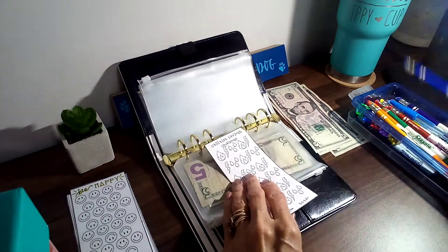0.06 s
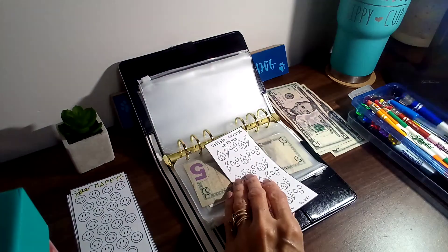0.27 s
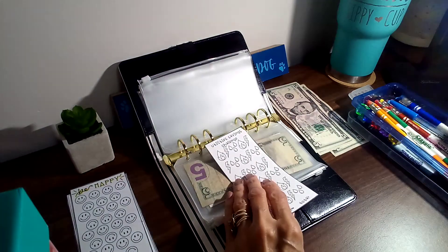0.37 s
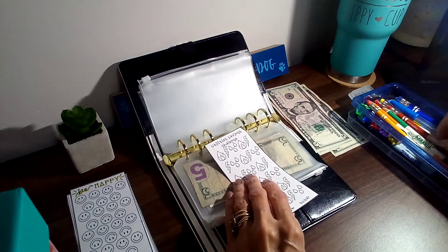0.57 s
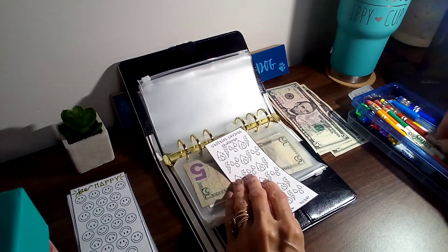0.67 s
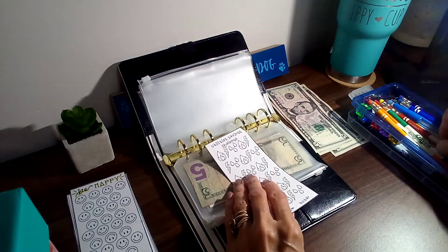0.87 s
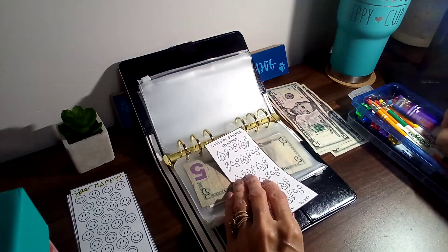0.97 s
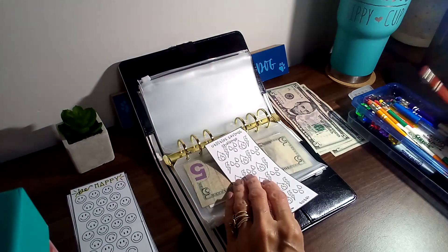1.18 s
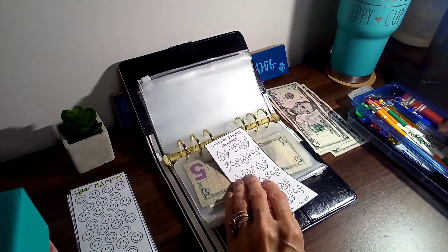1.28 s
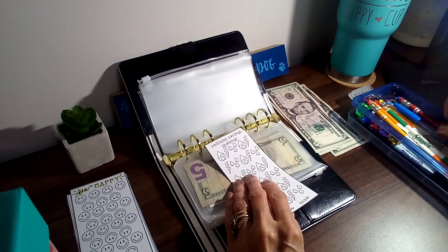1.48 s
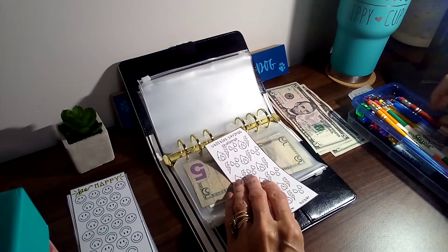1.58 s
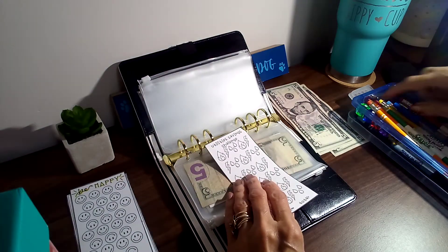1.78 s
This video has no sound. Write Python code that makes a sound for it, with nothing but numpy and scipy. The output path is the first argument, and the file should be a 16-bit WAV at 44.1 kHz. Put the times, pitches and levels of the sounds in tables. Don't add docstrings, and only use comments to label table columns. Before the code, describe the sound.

Markers and crayons clack sharply as a hand digs through a plastic box, with small shuffles and soft box thuds; a few drop, a short pause, then a last rummage. Small room, close small microphone.

```python
import sys
import numpy as np
from scipy import signal
from scipy.fft import rfft, irfft
from scipy.io import wavfile

SR = 44100
rng = np.random.default_rng(int(sys.argv[2]) if len(sys.argv) > 2 else 0)


def linear_from_db(decibels):
    return 10 ** (np.asarray(decibels, float) / 20)


def generate_wav(sig):
    pcm = np.round(np.clip(np.atleast_2d(sig).T, -1, 1) * 32767).astype(np.int16)
    wavfile.write(sys.argv[1], SR, pcm)


N = 81585


def rms_one(x):
    return x / np.sqrt(np.mean(x ** 2) + 1e-20)


def at_hz(points, hz):
    table = np.array(points)
    return np.interp(np.log(hz), np.log(table[:, 0]), table[:, 1])


def ring(force, hz, t60_s):
    r, w = linear_from_db(-60 / (t60_s * SR)), 2 * np.pi * hz / SR
    return signal.lfilter([0, np.sin(w)], [1, -2 * r * np.cos(w), r * r], force + 1e-18)


def cut(x, hz, kind, order=2):
    return signal.sosfilt(signal.butter(order, hz, kind, fs=SR, output="sos"), x)


# (frequency [Hz], level [dB])
FLOOR = [(40, -6), (65, 0), (300, -5), (1000, -13), (3000, -20), (6500, -28), (9000, -37), (13800, -36)]
FLOOR_DB = -75.5


def floor():
    hz = np.maximum(np.fft.rfftfreq(N, 1 / SR), 20)
    spectrum = rfft(rng.standard_normal(N)) * linear_from_db(at_hz(FLOOR, hz))
    return linear_from_db(FLOOR_DB) * rms_one(irfft(spectrum, N))


# (frequency [Hz], t60 [s])
ROOM_DECAY = [(300, 0.61), (1000, 0.31), (3000, .22), (6000, 0.14), (14000, 0.16)]
ROOM_DB, ROOM_GRAIN_DB, ROOM_LOW_HZ = -6, 5.5, 700
ROOM_DELAY_S, ROOM_END_S = 0.0044, 0.24


def room(x):
    t = np.arange(SR // 2) / SR
    edges_hz = 70 * 2. ** np.arange(9)
    echo = np.zeros(len(t))
    for low_hz, high_hz in zip(edges_hz, edges_hz[1:]):
        band = cut(rng.standard_normal(len(t)), [low_hz, high_hz], "band")
        echo += band * linear_from_db(-60 * t / at_hz(ROOM_DECAY, np.sqrt(low_hz * high_hz)))
    echo *= (1 - np.exp(-(t / ROOM_DELAY_S) ** 2)) * np.exp(-(t / ROOM_END_S) ** 4)
    echo *= linear_from_db(ROOM_GRAIN_DB * rms_one(cut(rng.standard_normal(len(t)), 200, "low")))
    echo /= np.sqrt(np.sum(echo ** 2))
    return linear_from_db(ROOM_DB) * signal.fftconvolve(cut(x, ROOM_LOW_HZ, "high", order=1), echo)[:N]


# (frequency [Hz], level [dB], t60 [s])
TAP_MODES = [
    (324, -60, 0.075),
    (1700, -73, 0.024),
    (3430, -66, 0.027),
]
TAP_S = 0.092


def tap():
    click = np.zeros(N)
    click[int(TAP_S * SR)] = 1
    return sum(linear_from_db(db) * ring(click, hz, t60_s) for hz, db, t60_s in TAP_MODES)


# (time [s], peak level [dB])
ROCK = [(0.239, -50.5), (0.318, -53), (0.383, -51), (0.508, -48), (0.559, -47.5), (0.584, -42),
        (0.724, -45), (0.819, -57.5), (0.945, -59), (1.069, -43.5), (1.119, -55.5), (1.219, -64),
        (1.338, -56), (1.445, -55), (1.509, -50), (1.569, -50)]
# (frequency [Hz], level [dB], t60 [s])
DESK = [(66, -6, .13), (88, -7, .12), (118, -9, .09), (172, -9, .1)]
# (frequency [Hz], level [dB], t60 [s])
BOX = [(168, -9, .1), (230, -16, .07), (350, -4, .12), (400, -14, .06), (495, -2, .08), (950, -12, .06)]
ROCK_SOFT_HZ, BOX_LOW_HZ = 201.1, 140


def box(push):
    s, rock_db = np.transpose(ROCK)
    rock = np.zeros(N)
    rock[(s * SR).astype(int)] = linear_from_db(rock_db)
    desk, thud = np.zeros((2, N))
    for hz, db, t60_s in DESK:
        uneven = rng.uniform(0.9, 2.42, N) * rng.choice([-1, 1], N)
        desk += linear_from_db(db) * ring(rock * uneven, hz, t60_s)
    for hz, db, t60_s in BOX:
        thud += linear_from_db(db) * ring(push * rng.uniform(0.87, 2.29, N), hz, t60_s)
    return cut(desk, ROCK_SOFT_HZ, "low", order=4) + cut(thud, BOX_LOW_HZ, "high")


# (time [s], level [dB])
STIR = [(.2, -45), (.25, -63), (.31, -60.5), (.46, -61), (.57, -48.5), (.66, -70.5), (0.738, -45.5),
        (.87, -105), (0.951, -59.5), (1.04, -87), (1.07, -66), (1.158, -53), (1.241, -73.5), (1.43, -45),
        (1.499, -57.5), (1.58, -56), (1.679, -81)]
# (start [s], end [s])
HAND = [
    (.2, 1.24),
    (1.43, 1.68),
]
SHUFFLES_PER_S, SHUFFLE_SPREAD_DB, SHUFFLE_CYCLES = 900, 2.37, 7


def shuffle():
    s, db = np.transpose(STIR)
    sizes = linear_from_db(SHUFFLE_SPREAD_DB * np.minimum(rng.exponential(1, N), 4)) * rng.choice([-1, 1], N)
    happens = rng.random(N) < SHUFFLES_PER_S / SR
    touches = linear_from_db(np.interp(np.arange(N) / SR, s, db)) * rms_one(sizes * happens)
    n = np.arange(N)
    touches = touches * sum((n > start * SR) & (n < end * SR) for start, end in HAND)
    dealt = rng.integers(0, 16, N)
    rings = np.zeros(N)
    for k, hz in enumerate(np.geomspace(900, 6800, num=16)):
        rings += ring(touches * (dealt == k), hz, SHUFFLE_CYCLES / hz)
    return rings / 4, touches


# (time [s], peak level [dB], barrel pitch [Hz], relative thud [dB], relative sharpness [dB])
DIG = [(0.203, -41, 1610, -23, -47), (0.205, -24, 1840, -6, -23), (0.233, -26.5, 1460, -14, 2),
       (0.238, -23, 2020, -15, -76), (0.257, -32.5, 1420, -10, -32), (0.291, -14.5, 2470, -26.5, -4.5),
       (0.373, -18.5, 4270, -23.5, -10), (0.441, -40.5, 1740, -7.5, -32), (0.486, -23.5, 2030, -25, -10.5),
       (0.517, -32, 3340, -39, -9), (0.529, -36, 4600, -45, -17), (0.538, -36.5, 2800, -44, -0.5),
       (0.551, -28.5, 2600, -40, -14), (0.561, -23, 3080, -10, -13), (0.579, -23, 2100, -41, -21),
       (0.593, -26, 2520, -15.5, -22), (0.642, -42, 2260, -51, -36), (0.676, -38.5, 1740, -21, -2.5),
       (0.685, -38, 1870, -30, -4), (0.721, -34, 1870, -28, -14.5), (0.727, -21.5, 3170, -35, -8.5),
       (0.75, -39.5, 3200, -35, -31), (0.769, -30, 3280, -52, -29)]
# (time [s], peak level [dB],
# barrel pitch [Hz], relative thud [dB], relative sharpness [dB])
LATER = [(0.876, -54.5, 1460, -32, -41), (0.9, -39.5, 2570, -60, -31), (0.928, -30, 4630, -58, -10.5),
         (0.941, -42.5, 1950, -42, -26), (0.947, -32, 2100, -25, -16.5), (1.012, -43, 3100, -31, -5),
         (1.025, -56, 6690, -13.5, 2), (1.05, -27.5, 4770, -45.5, -25.5), (1.054, -20.5, 6170, -17, -12.5),
         (1.058, -14, 3700, -41.5, -11.5), (1.11, -32, 2190, -17, -27), (1.14, -22.5, 4560, -36, -37),
         (1.145, -21.5, 3110, -30.5, -13), (1.161, -31, 3130, -21, -5.5), (1.433, -32, 1890, -49, -7),
         (1.444, -18.5, 2300, -28, -10.5), (1.489, -21.5, 5130, -26, -12.5), (1.504, -21, 4830, -49, -1.5),
         (1.531, -24.5, 2000, -43, -17.5), (1.57, -23, 3400, -22.5, -10.5)]
# (frequency [Hz], level [dB])
BARREL = [(950, -14.5), (1280, -37), (1640, -16), (1900, -5.5), (2250, -10.5), (2620, 1.5), (3100, -3),
          (3500, 4.5), (4050, -20.5), (4450, 11.5), (5200, -17.5), (5900, 7), (6500, 3.5)]
OWN_CYCLES, WALL_CYCLES = 32, 10
MODE_SPREAD_DB, DETUNE = 2.0, 0.05
OWN_DB, CRACK_DB, CLACK_DB, BOX_DB = -4, -17, 1, -10.5
CONTACT_S, RAGGED, SETTLE_DB, SETTLE_S = 0.001, 0.13, -29, 0.0069
PURER_DB_PER_DB, NEAR_DB_PER_OCTAVE = 0.15, 5.0
BODY_LOW_HZ = 1104


def contact(t, noise):
    edge = RAGGED * noise * (t / CONTACT_S) * np.exp(-t / CONTACT_S)
    force = edge + linear_from_db(SETTLE_DB) * noise ** 3 * np.exp(-t / SETTLE_S)
    force[int(CONTACT_S * SR)] += 1
    return force / np.sqrt(np.sum(force ** 2))


def clacks():
    rows, size = np.array(DIG + LATER), 4096
    t = np.arange(size) / SR
    click = 1. * (np.arange(size) == int(CONTACT_S * SR))
    body, sharp, push = np.zeros((3, N + size))
    for s, db, hz, thud_db, sharp_db in rows:
        force = contact(t, rng.standard_normal(size))
        own_db = OWN_DB - PURER_DB_PER_DB * (db + 21)
        hit = linear_from_db(own_db) * ring(click, hz, OWN_CYCLES / hz) + linear_from_db(CRACK_DB) * 4 * force
        for mode_hz, mode_db in BARREL:
            far_db = NEAR_DB_PER_OCTAVE * abs(np.log2(mode_hz / hz))
            gain = linear_from_db(mode_db + MODE_SPREAD_DB * rng.standard_normal() - far_db)
            tuned_hz = mode_hz * (1 + DETUNE * rng.standard_normal())
            hit = hit + gain * ring(force, tuned_hz, WALL_CYCLES / mode_hz)
        hit = cut(hit, BODY_LOW_HZ, "high")
        i = int((s - CONTACT_S / 2) * SR)
        body[i:i + size] += linear_from_db(db + CLACK_DB) * hit / np.max(np.abs(hit))
        sharp[i:i + size] += linear_from_db(db + sharp_db) * force
        push[i] += linear_from_db(db + thud_db + BOX_DB)
    return body[:N], sharp[:N], push[:N]


ROLL_HZ, SHELF_DB = 7000, 3
PORT_HZ, PORT_WIDTH_HZ, PORT_DB = 15200, 403, 23


def capsule(body, sharp):
    r, w = np.exp(-np.pi * PORT_WIDTH_HZ / SR), 2 * np.pi * PORT_HZ / SR
    zeros = np.array([1, 0, -1]) * (1 - r * r) / 2
    port = signal.lfilter(zeros, [1, -2 * r * np.cos(w), r * r], sharp)
    shelf = linear_from_db(SHELF_DB) * cut(sharp, ROLL_HZ, "high")
    return cut(body, ROLL_HZ, "low", order=8) + shelf + linear_from_db(PORT_DB) * port


SHUFFLE_SHARP_DB, SHUFFLE_LOW_DB, SELF_NOISE_DB = -29, -13, -101


def scene():
    body, sharp, push = clacks()
    rings, touches = shuffle()
    push = push + linear_from_db(SHUFFLE_LOW_DB) * touches / 10
    body = body + rings + box(push) + tap()
    self_noise = linear_from_db(SELF_NOISE_DB) * rng.standard_normal(N)
    near = capsule(body, sharp + linear_from_db(SHUFFLE_SHARP_DB) * touches + self_noise)
    return (near + room(near) + floor())[None]


def band_limit(x):
    return signal.sosfilt(signal.butter(12, 16950, fs=SR, output="sos"), x)


LOW_CUT_HZ, TOP_CUT_HZ = 69, 16530


def record(dry):
    top_cut = signal.cheby2(10, 50, TOP_CUT_HZ, fs=SR, output="sos")
    mix = signal.sosfilt(top_cut, cut(dry, LOW_CUT_HZ, "high"))
    return band_limit(mix)


dry = scene()
out = record(dry)
generate_wav(out)
```